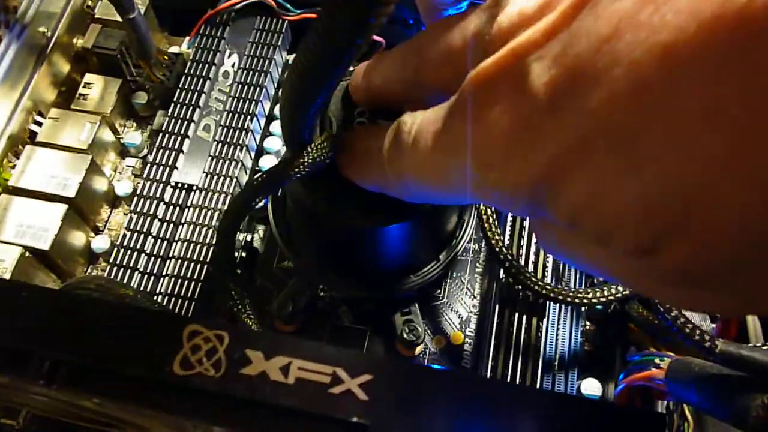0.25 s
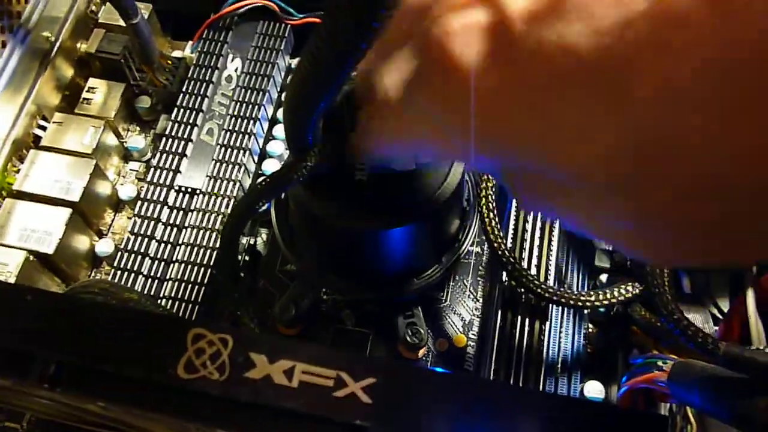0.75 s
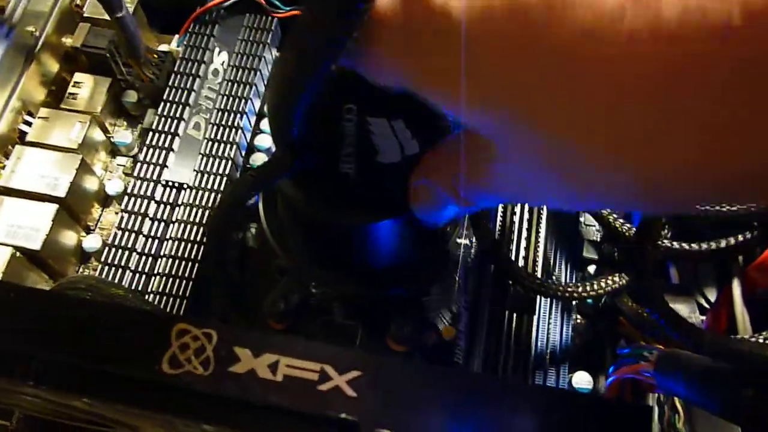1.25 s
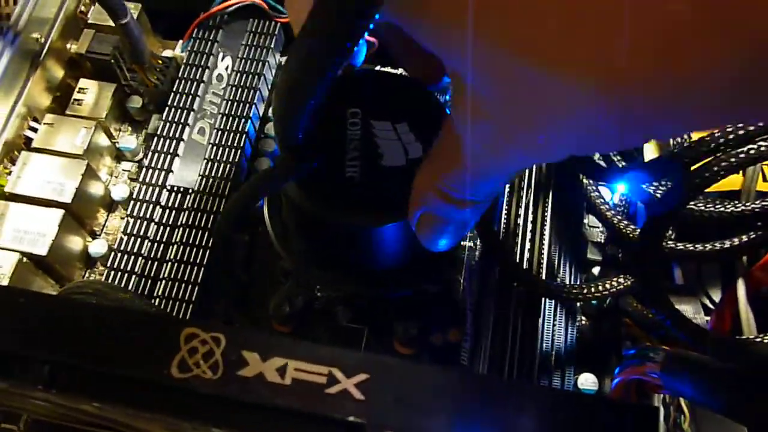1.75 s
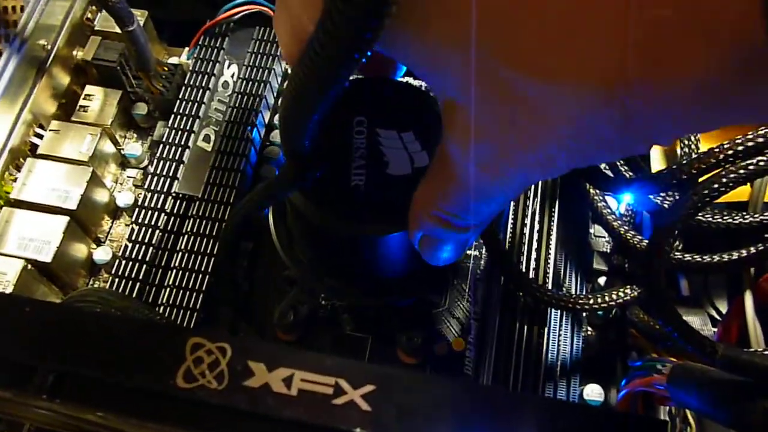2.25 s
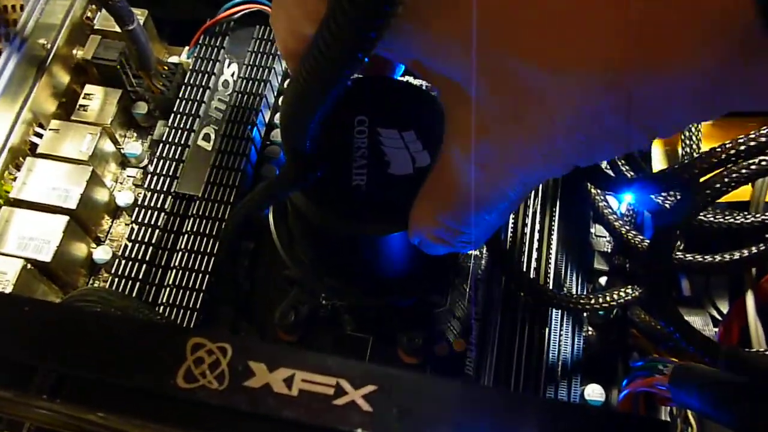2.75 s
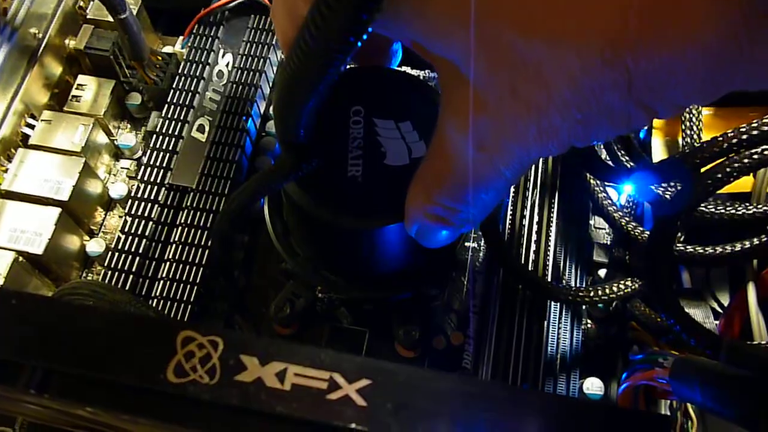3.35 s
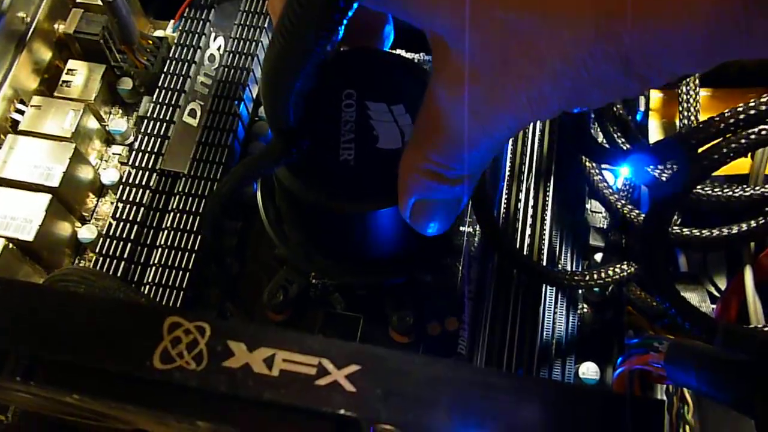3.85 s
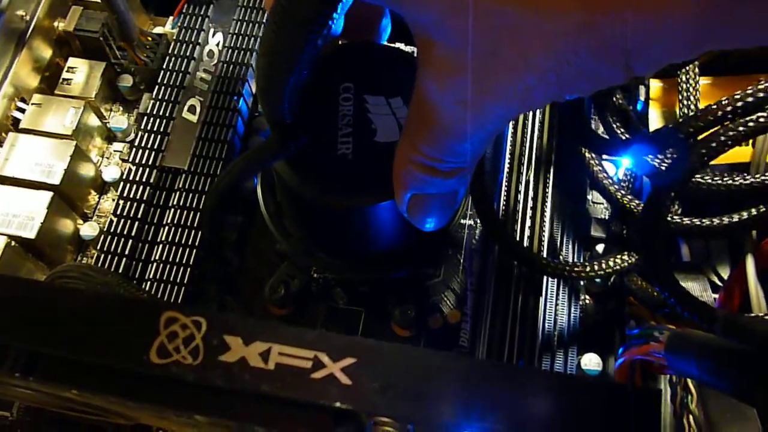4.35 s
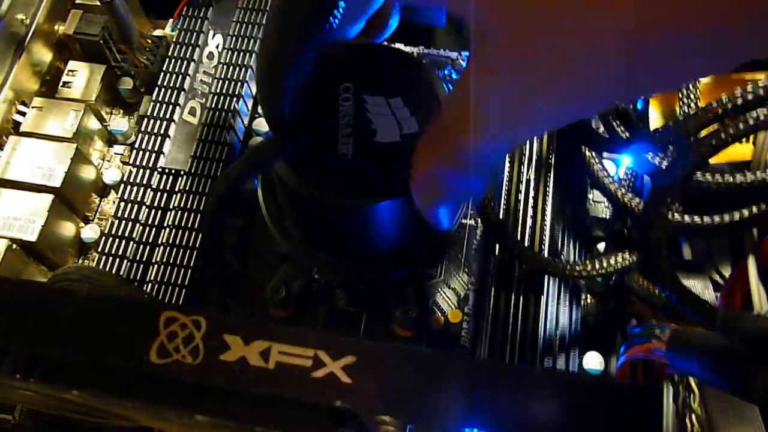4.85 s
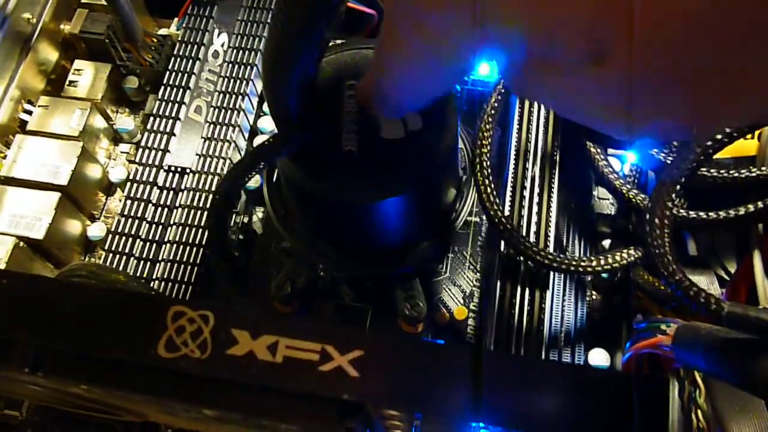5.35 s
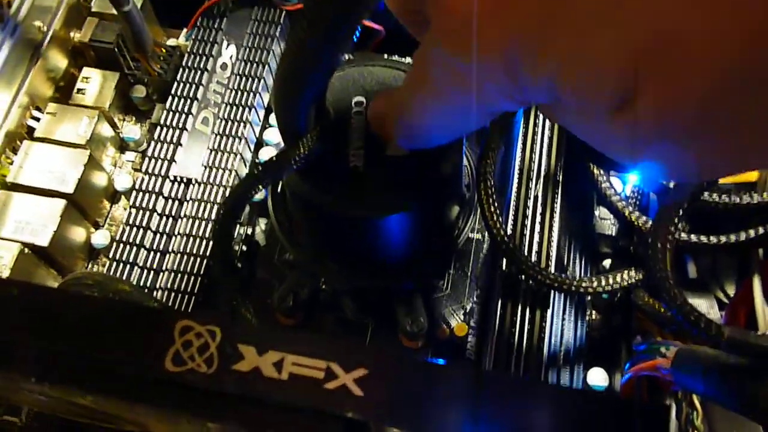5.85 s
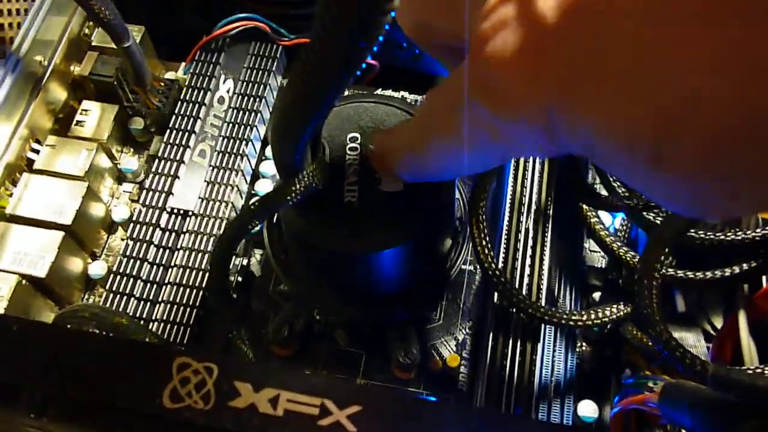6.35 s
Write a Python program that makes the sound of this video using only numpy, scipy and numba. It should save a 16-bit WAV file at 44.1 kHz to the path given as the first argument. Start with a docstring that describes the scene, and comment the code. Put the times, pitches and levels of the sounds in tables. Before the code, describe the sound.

A worn pump inside an open computer case buzzes and whines loudly, its pitch wavering, sagging into a rough growl and recovering as a hand squeezes it.

```python
"""Inside an open computer case, a worn pump rattles close to a microphone while a hand squeezes its housing.
The loose rotor knocks three times a turn and scrapes over the same rough track, so the buzz repeats with
the shaft; chipped spots strike the shell and clean shaft multiples whine.
The grip brakes the shaft and retunes the housing. Behind it the case hums and rumbles,
and fans rush as flickering bands of noise and whine as slightly wavering sines."""
import sys
import numpy as np
from scipy import signal
from scipy.io import wavfile
from scipy.ndimage import uniform_filter1d
from numba import njit

SR = 44100
rng = np.random.default_rng(int(sys.argv[2]) if len(sys.argv) > 2 else 0)


def transcribe(signal):
    """Save signal, clipped to [-1, 1], as a 16-bit WAV file at the path in sys.argv[1]."""
    frames = np.atleast_2d(signal).T
    limited = np.clip(frames, -1, 1)
    pcm = np.round(limited * 32767).astype(np.int16)
    wavfile.write(sys.argv[1], SR, pcm)


N = 291501

# Where in a turn the rotor knocks: three shaft angles [turns]
KNOCK_ANGLES = (.04, .36, .7)


def undb(db):
    """Gain of a level in dB."""
    return 10 ** (np.asarray(db) / 20)


def unit(x):
    """Scale to rms 1."""
    return x / np.sqrt(np.mean(x ** 2))


def knocks(turn, hz, loose, strengths_db):
    """Three soft blows a turn ring the damped housing, whose upper ring moves with the hand."""
    # Rings the hand does not move: (frequency [Hz], width [Hz], relative level [dB])
    fixed_rings = [(536, 60, -5), (850, 70, -7), (1030, 190, -23), (1290, 320, -38), (2050, 580, -26.5)]
    width = np.full(N, 1. * 170)  # of the moving ring, Hz
    push = sum(blows(turn, angle, db, loose, slip=3.0, scatter_db=2.7)
               for angle, db in zip(KNOCK_ANGLES, strengths_db))
    push = push + .01 * track(turn, loose / 3)  # the rotor also drags between blows
    # rubber mounts round off each blow
    soft = svf(push, hz, 4.0 * width)
    soft = svf(soft, hz, 4.0 * width)
    body = svf(soft, hz, width) + rings(soft, fixed_rings[:2])
    body = body + rings(push, fixed_rings[2:])
    return steady(body)  # the motor's push per turn is shared among the blows


def strengths():
    """Level of each knock of a turn in dB, falling with its angle from the hardest one."""
    # Under the squeeze the hardest knock slips once round the housing:
    # (time [s], angle of the hardest knock [turns], drop of a knock opposite it [dB])
    slip_path = [(3.6, .04, 9), (3.78, .04, 13), (3.9, .04, 12), (4.03, -.04, 4), (4.1, .36, 6),
                 (4.3, .55, 7), (4.55, .7, 16), (4.68, .7, 15), (4.9, 1.04, 11), (5.2, 1.04, 9)]
    hardest, drop_db = curves(slip_path)
    return [-drop_db * np.sin(np.pi * (angle - hardest)) ** 2 for angle in KNOCK_ANGLES]


def blows(turn, angle, db, loose, slip, scatter_db):
    """A pulse at one shaft angle each turn; a loose rotor lands early or late, hard or soft."""
    # slip [samples] and scatter_db [dB] are the random spreads at full looseness
    out = np.zeros(N + 1)
    at = np.interp(np.arange(1, int(turn[-1])) + angle, turn, np.arange(N))
    i = at.astype(int)
    chance = rng.standard_normal((len(at), 2))
    at = np.clip(at + loose[i] * slip * chance[:, 0], 0, N - 1)
    size = undb(db[i] + loose[i] * scatter_db * chance[:, 1])
    # share each pulse between the two nearest samples
    i = at.astype(int)
    out[i] += size * (1 - at + i)
    out[i + 1] += size * (at - i)
    return out[:N]


def scrape(turn, upper_db, throb_db, loose):
    """Bumps on the track tick the thin shell, hardest over the half turn where the rotor leans."""
    # Lower and upper rings of the shell: (frequency [Hz], width [Hz], relative level [dB])
    shell_low = [(3580, 160, -13.5), (4018, 89, -4), (4310, 29, -5.5), (4774, 224, -1.5), (4520, 1090, -13)]
    shell_high = [(5495, 71, -4), (5675, 51, 0), (5950, 100, -2.5), (6355, 290, 2), (6600, 380, -3.5),
                  (7560, 120, -14.5), (6230, 870, -7.5)]
    swing = np.cos(2 * np.pi * (turn - .55))
    swing = swing + 0.43 * loose * np.cos(6 * np.pi * (turn - .45))  # jolted by each knock
    rough = track(turn + .0002 * walk(30), loose)
    bumps = rough * np.abs(rough) + 0.12 * rng.standard_normal(N)
    ticks = steady(bumps * undb(throb_db / 2 * swing))
    low, high = steady(rings(ticks, shell_low)), steady(rings(ticks, shell_high))
    shell = unit(undb(-1.5 - upper_db / 2) * low + undb(-1.5 + upper_db / 2) * high)
    return shell + rings(ticks, [(2560, 4500, -28.5), (7930, 480, -15)])  # faint extra rings


def track(turn, renew):
    """A rough ring of cells round the shaft; every turn keeps the last one but for a renewed share."""
    cells = 1024  # per turn
    first = np.searchsorted(turn, np.arange(int(turn[-1]) + 1))
    surface, rows = rng.standard_normal(cells), []
    for share in np.clip(renew[first], 0, 1):
        surface = np.sqrt(1 - share) * surface + np.sqrt(share) * rng.standard_normal(cells)
        rows.append(surface)
    return np.interp(turn * cells, np.arange(len(rows) * cells), np.concatenate(rows))


def dent(turn, loose):
    """Chipped spots on the track strike the shell at the same angles every turn, less exactly when loose."""
    # Shell rings the chips excite: (frequency [Hz], width [Hz], relative level [dB])
    dent_rings = [(4790, 120, 7), (4020, 150, -14), (5270, 70, -7), (6500, 500, -8), (8200, 1400, -21)]
    # Where the chips sit: (angle [turns], relative level [dB])
    chips = [(.47, 0), (.56, -6), (.24, -10)]
    strikes = sum(blows(turn, angle, np.full(N, 1. * db), loose, slip=7.2, scatter_db=11)
                  for angle, db in chips)
    return unit(rings(strikes, dent_rings))


def whine(turn, loose, orders_db, blade_db):
    """Clean shaft multiples that swell over most of a turn, and blade tones; the hard squeeze mutes both."""
    # Upper shaft multiples, most from the seven-blade impeller: (multiple, relative level [dB])
    blade_orders = [(14, 8), (17, 4.5), (19, -3), (21, 2), (28, -2), (32, -18.5), (35, -3.5), (42, -8),
                    (49, -9)]
    lean, spread = .55, .11  # turns; staggered starts stretch the swell
    main = 0
    for k, db in enumerate(orders_db):
        phase = (9 + k) * (turn - lean) + spread * (k - 2) ** 2  # turns
        level = undb(db + 7.6 * loose * walk(25))
        main = main + np.sqrt(2) * level * np.cos(2 * np.pi * phase)
    flutter_db = 2.
    blades = sum(undb(db + flutter_db * walk(6.5)) * np.cos(2 * np.pi * (k * turn + rng.random()))
                 for k, db in blade_orders)
    return freedom() * (main + undb(blade_db) * blades)


def multiples(speed, main_db, main_hz, width, upper_db, upper_hz):
    """Levels [dB] of shaft multiples 9-13: four share the main ring by nearness, the last lies in the upper."""
    upper_width_hz, upper_whine_db = 19, -2  # the level is against the upper ring's
    orders = np.arange(9, 13)[:, None]
    near = 1 / (1 + ((orders * speed - main_hz) / width) ** 4)
    shared_db = main_db + 10 * np.log10(near / near.sum(axis=0))
    last = 1 / (1 + ((13 * speed - upper_hz) / upper_width_hz) ** 2)
    return [*shared_db, upper_db + upper_whine_db + 10 * np.log10(last)]


def freedom():
    """1 while the housing rings freely, 0 in the hard squeeze that damps the whine."""
    # Start and end of the hard squeeze [s]
    start, end = (3.76, 4.67)
    t = np.arange(N) / SR
    return np.clip(np.maximum(start - t, t - end) / 0.028, 0, 1)  # 28 ms ramps


def hum(turn):
    """The unbalanced rotor shakes the case at low multiples of its speed."""
    # Partials of the hum: (multiple of the shaft speed, relative level [dB])
    partials = [(1, -15.5), (2, -26), (3, -2), (4, 2), (5, -5), (6, -7.5), (7, 2), (8, -5)]
    waver_db = 2.
    return unit(sum(undb(db + waver_db * walk(6.6)) * np.sin(2 * np.pi * (k * turn + rng.random()))
                    for k, db in partials))


def rumble():
    """The case panels shake in the bass: noise through a resonance, twice."""
    panel = ring(rng.standard_normal(N), 105, 65)
    return unit(ring(panel, 105, 65))


def rush():
    """Fan air as noise in third-octave bands, each flickering a little."""
    # Spectrum of the air: (frequency [Hz], relative level [dB per Hz])
    spectrum = [(12, -31), (20, -16), (34, -28.5), (54, -24.5), (172, -5), (410, -7), (457, 1), (556, -7.5),
                (896, -8), (1380, -5), (2960, -19.5), (3600, -10.5), (4680, -19.5), (7920, -120)]
    f, db = np.transpose(spectrum)
    out = 0
    for hz in 25 * 2 ** (np.arange(23) / 3):
        band = ring(ring(rng.standard_normal(N), hz, hz / 3), hz, hz / 3)
        level_db = np.interp(np.log(hz), np.log(f), db) + 1.23 * walk(8.7)
        out = out + undb(level_db) * band
    return unit(out)


def fans():
    """Steady fan tones, sines that waver slightly in pitch and level."""
    # Blade and motor tones: (frequency [Hz], level before a 1 dB lift [dB])
    tones = [(1400.9, -47.5), (1977, -52), (2101, -54.5), (2451, -59.5), (2802, -58), (3153, -70.5)]
    out = 0
    for f, db in tones:
        level = undb(db + 1.0 + 0.48 * walk(2.0))
        hz = f * (1 + 0.000605 * walk(3))
        out = out + level * np.sin(2 * np.pi * np.cumsum(hz) / SR)
    return out


def curves(table):
    """The columns of a table after its time column, interpolated to one value a sample."""
    s, *columns = np.transpose(table)
    return [np.interp(np.arange(N) / SR, s, c) for c in columns]


def rings(x, modes):
    """A body's resonances, neighbours in opposite phase."""
    return sum((-1) ** k * undb(db) * ring(x, f, w) for k, (f, w, db) in enumerate(modes))


def ring(x, hz, width):
    """One fixed resonance, gain 1 at the centre."""
    return signal.lfilter(*signal.iirpeak(hz, hz / width, SR), x)


@njit
def svf(x, hz, width):
    """State-variable band-pass with moving centre and width, gain 1 at the centre."""
    y, b, l = np.empty(len(x)), 0., 0.
    for i in range(len(x)):
        g, k = np.tan(np.pi * hz[i] / SR), width[i] / hz[i]
        v = (b + g * (x[i] - l)) / (1 + g * (g + k))
        b, l, y[i] = 2 * v - b, l + 2 * g * v, k * v
    return y


def walk(rate):
    """Random levels held 1 / rate s and slewed twice; spread near 1."""
    k = int(SR / rate)
    held = np.repeat(rng.standard_normal(N // k + 1), k)
    return 1.416 * uniform_filter1d(uniform_filter1d(held, k), k)[:N]


def steady(x):
    """Even out the level over a few turns."""
    return x / np.sqrt(uniform_filter1d(x ** 2, size=3500))


def scene():
    """Pump, hum, rumble, air and fan tones at one microphone."""
    # Shaft under the braking hand: (time [s], speed [Hz])
    shaft = [(0.0, 51.92), (0.15, 51.97), (0.31, 51.75), (0.48, 49.84), (0.62, 49.5), (1.03, 50.52),
             (1.5, 50.97), (2.06, 50.71), (2.43, 50), (2.56, 50.23), (2.83, 52.5), (3.11, 54.66),
             (3.26, 55.05), (3.39, 54.8), (3.61, 52.5), (3.83, 48.67), (4.07, 42.66), (4.36, 37.32),
             (4.58, 35.4), (4.71, 38.06), (4.92, 43.54), (5.17, 47.37), (5.49, 49.7), (5.71, 50),
             (5.93, 48.95), (6.26, 46.7), (6.44, 48.1), (6.61, 49.14)]
    # Grip: (time [s], looseness of the rotor [0-1])
    grip = [(0, .04), (.3, .05), (.45, .15), (.9, .05), (2.3, .035), (2.8, .2), (3.5, .2), (3.8, .35),
            (4.1, .55), (4.65, .45), (5.2, .12), (5.8, .1), (6.2, .2), (6.61, .1)]
    # Main ring of the housing under the hand: (time [s], whine level [dB], pitch [Hz], width [Hz])
    held = [(0.0, -27, 501, 31), (0.34, -27, 474, 39.6), (0.43, -37.5, 529.8, 56), (0.6, -29, 530.2, 37),
            (0.8, -33, 531.3, 37), (0.98, -34.5, 436, 91.5), (1.4, -30, 432.6, 51.6), (2.1, -32.5, 447, 85),
            (2.42, -31.5, 533, 36), (2.6, -34.5, 468, 67.4), (2.75, -27.5, 486, 23), (3.1, -27.5, 528, 39),
            (3.3, -27, 540, 49), (3.46, -25, 507, 41), (3.62, -28, 512.5, 35), (3.76, -33, 590, 110),
            (4.67, -41, 473, 56), (4.9, -37, 468, 13.8), (5.06, -41.5, 491.8, 42), (5.2, -30, 498.6, 26),
            (5.4, -27, 513.7, 25), (5.7, -31.5, 515.7, 56), (5.9, -28.5, 532.8, 25.7),
            (6.06, -31, 489.4, 52), (6.22, -37, 488, 64), (6.45, -28.5, 500, 12.7),
            (6.61, -29.5, 513, 41.5)]
    # Upper ring of the housing: (time [s], level before the knock and whine offsets [dB], pitch [Hz])
    upper = [(0, -38, 622), (0.37, -40, 660), (0.64, -36.5, 638), (0.9, -46.5, 670), (1.12, -39, 696),
             (2.15, -35.5, 694), (2.36, -32.5, 687), (2.58, -44, 650.2), (2.74, -37.5, 702),
             (2.82, -42, 619), (3.33, -34.5, 621), (3.52, -39.5, 627), (3.62, -26, 642), (3.72, -39, 622),
             (3.79, -26, 684), (3.97, -23.5, 632), (4.09, -25.5, 670), (4.17, -28, 600), (4.3, -28.5, 630),
             (4.37, -26, 720), (4.51, -26.5, 700), (4.6, -30, 690), (4.67, -37.5, 634), (5.08, -36, 633.5),
             (5.84, -33.5, 660), (5.98, -39, 640), (6.27, -31, 606), (6.41, -38.5, 623), (6.61, -36.5, 645)]
    # Bearing: (time [s], lower shell rings [dB], upper shell rings [dB],
    # dent's ring before looseness [dB], depth of the throb before looseness [dB])
    bearing = [(0.0, -37.5, -32, -51, 5.5), (0.27, -37, -31.5, -38.5, 8.5), (0.39, -42, -30.5, -41, 9.5),
               (0.66, -40.5, -35, -52, 5.5), (1.08, -34.5, -32.5, -34, 6.5), (1.23, -37.5, -32, -41, 6),
               (1.29, -32.5, -32.5, -33.5, 7.5), (1.64, -35, -33, -32, 3), (1.75, -37.5, -34, -39, 4),
               (2.15, -35, -30, -38.5, 5.5), (2.82, -40, -37.5, -43, 5.5), (3.18, -39.5, -37.5, -42, 8.5),
               (3.31, -36.5, -32.5, -39, 4), (3.9, -41.5, -34, -45, 6), (3.98, -38, -36.5, -43, 3),
               (4.18, -42, -31, -47, 1.5), (4.21, -35.5, -31.5, -39, 7), (4.31, -45.5, -35, -48, 8),
               (4.51, -39.5, -34, -45, 6.5), (4.69, -46.5, -40.5, -53, 9.5), (5.25, -37, -32.5, -49, 6.5),
               (5.71, -35.5, -30, -39, 6.5), (6.06, -40.5, -34.5, -48, 7), (6.15, -36.5, -33.5, -46, 2.5),
               (6.44, -39.5, -35, -45, 7), (6.61, -38, -31.5, -33, 6)]
    # What the hand lets through: (time [s], air rush [dB], shaft hum [dB], case rumble [dB])
    air = [(0.0, -38, -51, -59), (0.13, -37.5, -42, -54), (0.18, -37.5, -47, -56), (0.29, -37.5, -48, -49),
           (0.33, -37, -47, -71), (0.37, -40.5, -44.5, -57), (0.5, -41, -48, -72), (0.64, -40.5, -48, -63),
           (1.29, -36.5, -40.5, -59.5), (2.59, -37, -44.5, -56.5), (3.11, -33, -42.5, -44.5),
           (3.59, -37, -39.5, -53), (3.66, -39, -47, -68), (4.21, -36, -51, -64), (4.34, -41.5, -53.5, -60),
           (5.5, -36, -40.5, -51), (6.11, -39.5, -50.5, -57.5), (6.61, -36.5, -43, -51)]
    (speed,), (loose,) = curves(shaft), curves(grip)
    (main_db, main_hz, width), (upper_db, upper_hz) = curves(held), curves(upper)
    low_db, high_db, dent_db, throb_db = curves(bearing)
    air_db, hum_db, rumble_db = curves(air)

    turn = np.cumsum(speed) / SR
    knock_at_s = 3.8725  # one first knock, which sets the shaft's angle
    turn += (KNOCK_ANGLES[0] - turn[int(knock_at_s * SR)]) % 1

    # unsqueezed knocks lie 4 dB under the upper ring's level
    pump = undb(upper_db - 4 * freedom()) * knocks(turn, upper_hz, loose, strengths())
    orders_db = multiples(speed, main_db, main_hz, np.maximum(width, 10), upper_db, upper_hz)
    # a loose rotor weakens blade tones and dents and deepens the throb
    pump += whine(turn, loose, orders_db, -44.5 - 50 * loose)
    both = np.hypot(undb(low_db), undb(high_db))
    pump += both * scrape(turn, high_db - low_db, throb_db + 2.5 * loose, loose)
    pump += undb(dent_db - 20.5 * loose) * dent(turn, loose)
    case = undb(hum_db) * hum(turn) + undb(rumble_db) * rumble()
    return (pump + case + undb(air_db) * rush() + fans())[None]


def record(dry):
    """The microphone has a narrow notch, rolls off above 7 kHz, cuts the top and adds a small offset."""
    notched = dry[0] - ring(dry[0], hz=4387, width=40)
    dull = signal.sosfilt(signal.butter(5, 7300, fs=SR, output="sos"), notched)
    dull = signal.sosfilt(signal.cheby1(8, 1, 8550, fs=SR, output="sos"), dull)
    cut = signal.sosfilt(signal.ellip(12, .2, 80, 9100, fs=SR, output="sos"), dull)
    return cut[None] + .0046


dry = scene()
out = record(dry)
transcribe(out)
```